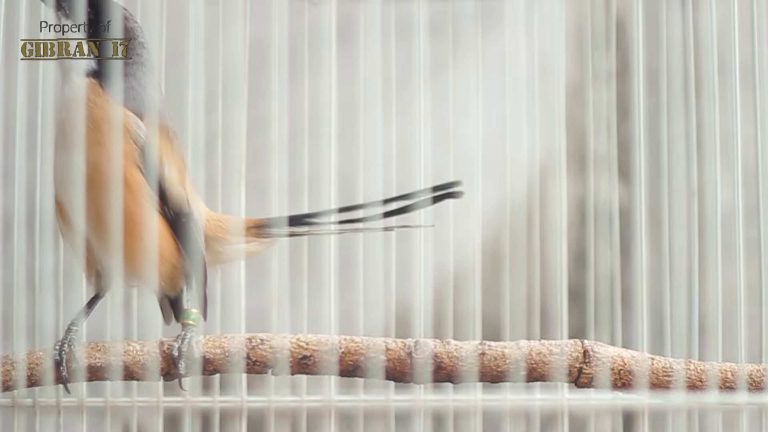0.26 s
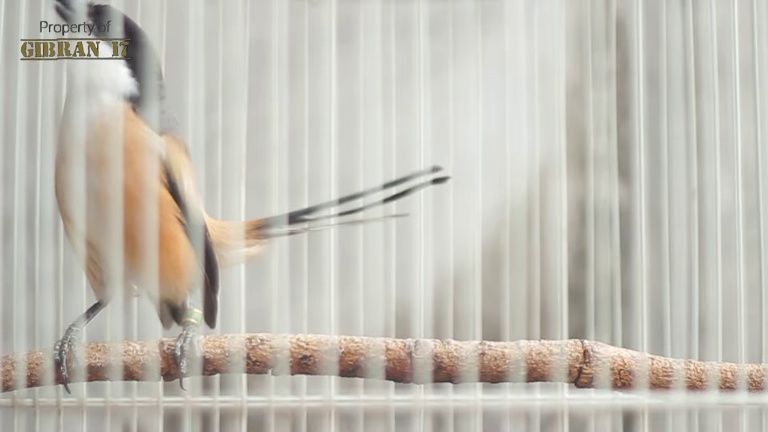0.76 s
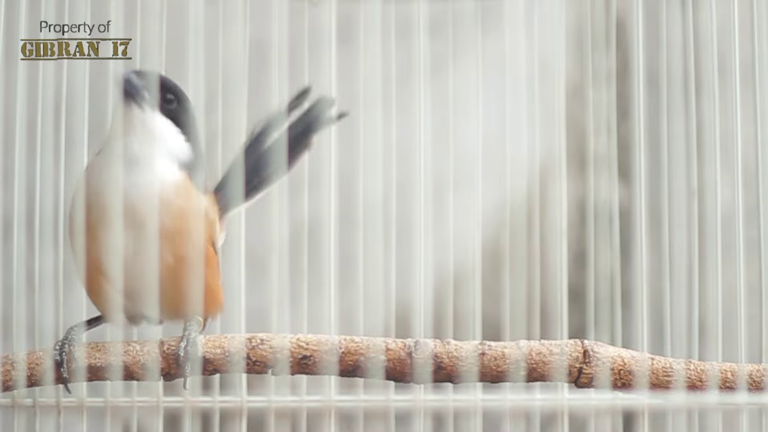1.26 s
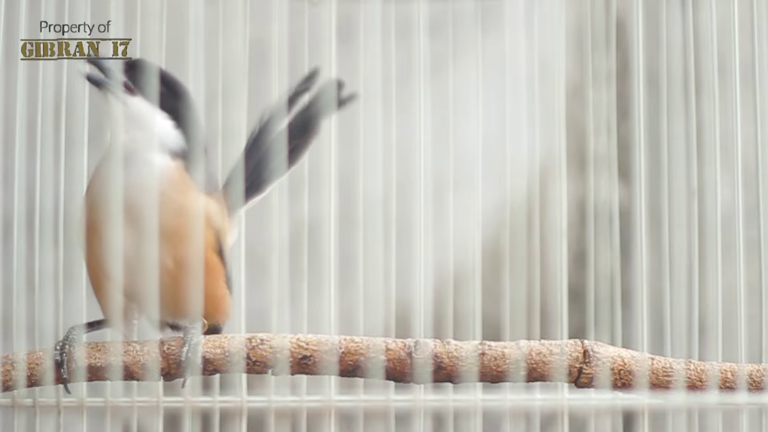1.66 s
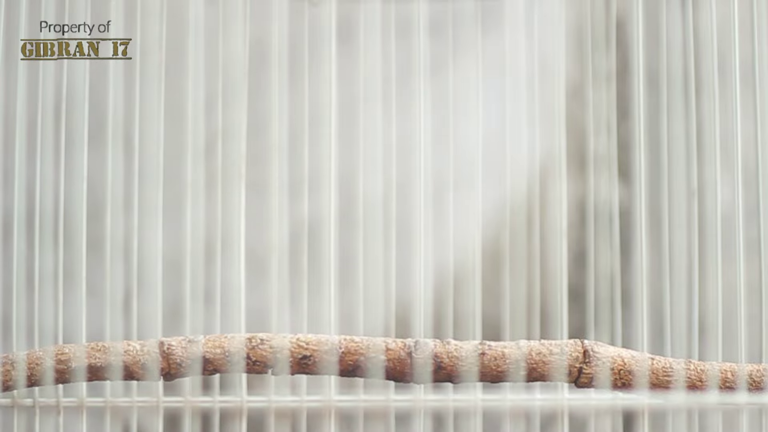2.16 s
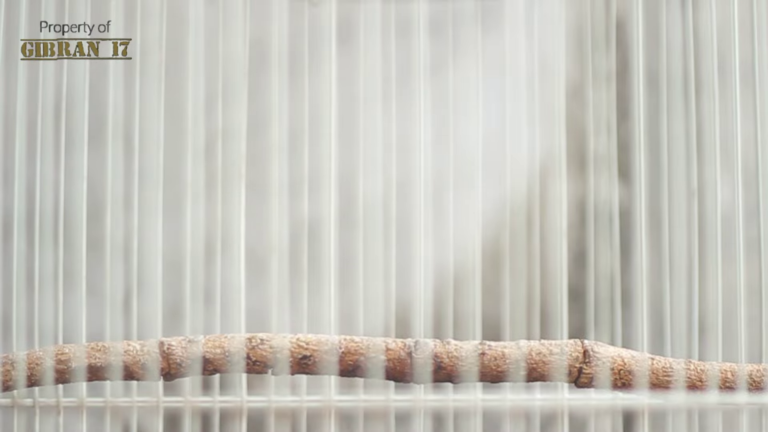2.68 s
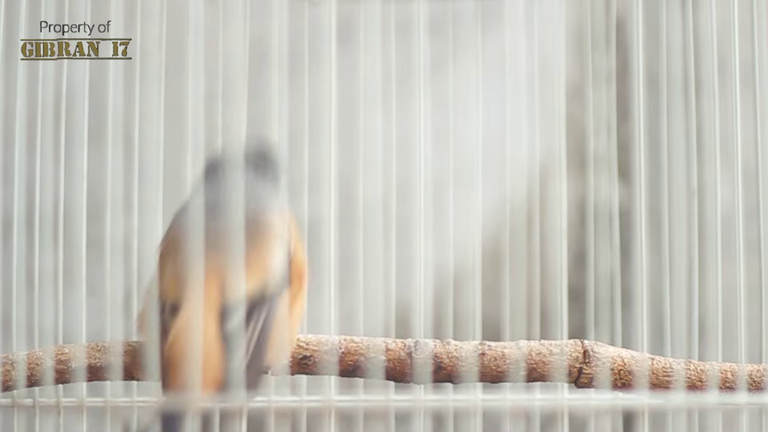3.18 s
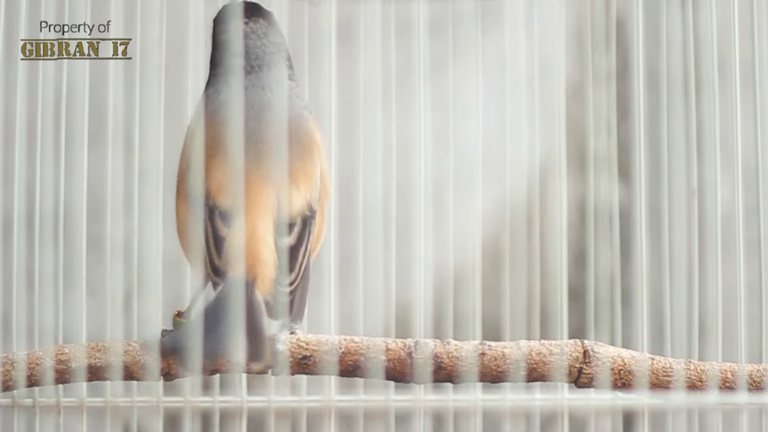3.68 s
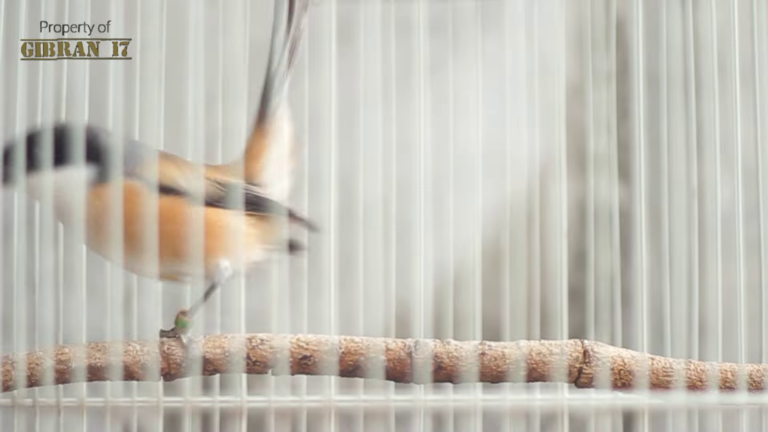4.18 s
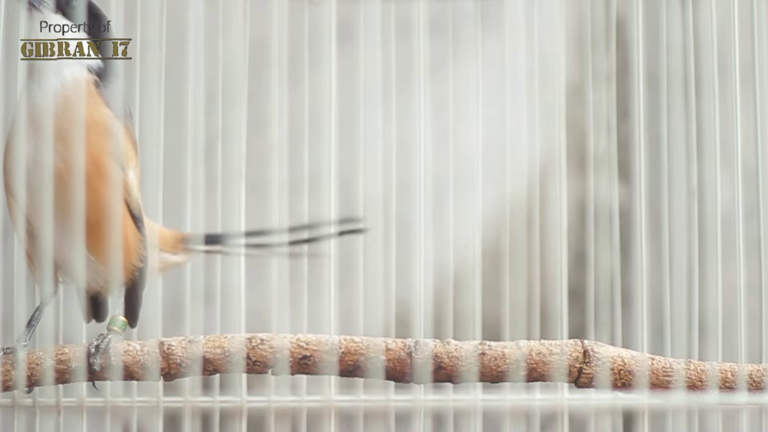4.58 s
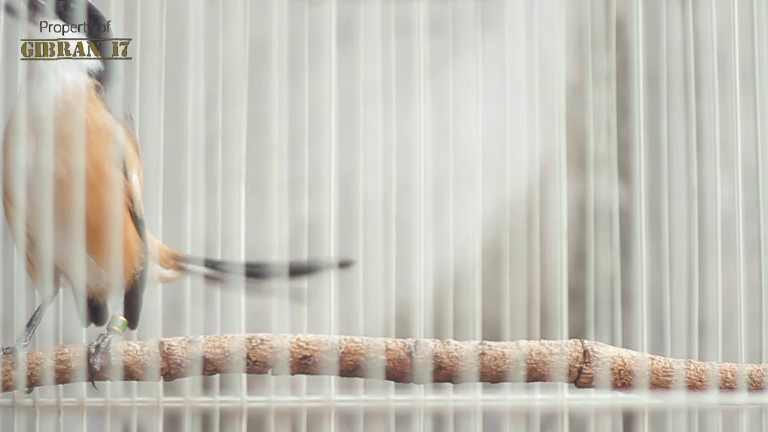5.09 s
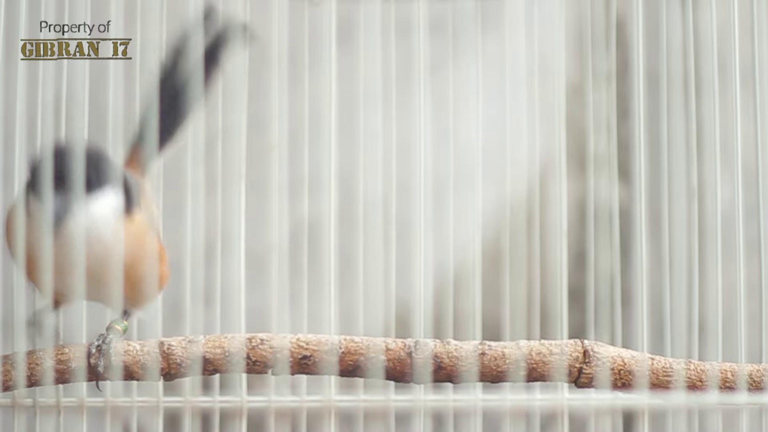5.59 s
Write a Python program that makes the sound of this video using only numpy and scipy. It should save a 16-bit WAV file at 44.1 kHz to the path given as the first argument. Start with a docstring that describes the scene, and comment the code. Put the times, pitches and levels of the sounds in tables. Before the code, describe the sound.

Sharp, high calls from a close caged bird ring briefly in a hard room, slightly overloading the microphone. They begin as evenly spaced, rasping bursts of a chip and two falling whistles, then turn into clearer two-note calls that quicken. Light wing ruffles, dry perch taps and thin wire ticks fall in the gaps, over a faint outdoor rumble and hum, far-off chirps and a distant revving engine.

```python
"""In a hard-walled room, a caged shrike calls close to the microphone, loud enough to overload it.
Its voice box has two sides, each making its own tone. First come rasping calls (a rising chip and two
falling whistles), the earliest heard only as a fading echo; then clear calls (a chip and one whistle)
that get shorter and closer together. Between calls the bird flutters and hops on its perch and wires.
Behind it are faint far-off birds, outdoor rumble, a hum and a distant engine."""
import sys
import numpy as np
from scipy import signal
from scipy.fft import rfft, irfft
from scipy.io import wavfile

SR = 44100
rng = np.random.default_rng(int(sys.argv[2]) if len(sys.argv) > 2 else 0)


def transcribe(signal):
    """Save signal, clipped to [-1, 1], as a 16-bit WAV file at the path in sys.argv[1]."""
    frames = np.atleast_2d(signal).T
    limited = np.clip(frames, -1, 1)
    pcm = np.round(limited * 32767).astype(np.int16)
    wavfile.write(sys.argv[1], SR, pcm)


N = 257544
LEAD = SR // 4   # extra samples before time zero, so an earlier call can echo into the scene


def rasping_calls():
    """A chip sung by both sides of the voice box, then two whistles. Yields (t/s, note, direct/dB)."""
    # one call a row: t/s, chip length/s, chip f/Hz, chip level/dB, chip's second voice/dB,
    # whistle f/Hz, whistle level/dB, note spacing/s, overtones/dB, direct sound/dB
    calls = [(-.240, 0.029, 3180, -8, -6.5, 4230, 2, 0.05, -1, 0),
             (0.4937, 0.025, 3139, -9, -0.5, 4196, 0.5, .049, 0, -3),
             (1.487, .030, 3260, -7, -4.5, 4264, .5, .0515, -1, 0.5),
             (2.444, .032, 3324, -7.5, -2.5, 4317, .5, .050, -3.5, .5),
             (3.274, 0.035, 3205, -8.5, -2.5, 4257, 0.5, 0.054, -1, -1)]
    for s, length, hz, db, second_db, whistle_hz, whistle_db, spacing, overtones_db, direct_db in calls:
        note = chip(length, hz, db, overtones_db - 2.5, second_db,
                    scoop_octaves=.3, creep_octaves=.08, swoop_ratio=1.5, attack_share=.43)
        yield s, note, direct_db
        for k, accent_db in ((1, .27), (2, -2)):   # the second whistle is weaker
            note = whistle(.0275, whistle_hz, whistle_db + accent_db, overtones_db - 1.5, top_hz=6812,
                           glide_share=.33, fade_db=-2, second_hz=5577, second_db=-15.5, edge_db=11.5)
            yield s + k * spacing, note, direct_db


def clear_calls():
    """A chip sung almost by one side alone, then a whistle by both. Yields (t/s, note, direct/dB)."""
    # one call a row: t/s, chip length/s, chip f/Hz, upward slide/octaves, chip level/dB,
    # chip overtones/dB, whistle f/Hz, whistle level/dB, whistle's second voice f/Hz and level/dB,
    # note spacing/s, direct sound/dB
    calls = [(4.393, 0.03, 3430, .28, -7.5, 5.5, 4081, -0.5, 5117, -2, 0.045, 1.5),
             (5.1135, .028, 3236, 0.11, -10, 8.5, 4105, -2, 5348, -5, 0.042, 1.5),
             (5.5359, 0.015, 3300, 0.127, -11, 14, 5396, 0.5, 4456, -11.5, .0415, 2.5)]
    for (s, length, hz, slide, db, overtones_db,
         whistle_hz, whistle_db, second_hz, second_db, spacing, direct_db) in calls:
        note = chip(length, hz, db, overtones_db, second_db=-23,
                    scoop_octaves=.37 * slide, creep_octaves=slide, swoop_ratio=1.36, attack_share=.33)
        yield s, note, direct_db
        note = whistle(.93 * length, whistle_hz, whistle_db, bright_db=-1.5, top_hz=6700,
                       glide_share=.44, fade_db=-5, second_hz=second_hz, second_db=second_db, edge_db=-3)
        yield s + spacing, note, direct_db


def chip(length, held_hz, level_db, bright_db, second_db, scoop_octaves, creep_octaves, swoop_ratio,
         attack_share, second_hz=4330, rasp_db=-17, crescendo_db=2):
    """A note that scoops up, creeps higher, then breaks upward; a higher second voice makes it rasp."""
    share = np.linspace(0, 1, int(length * SR))   # how far through the note we are
    below = 1 - step_up(share, at=.62 * attack_share, width=.066)
    swoop = step_up(share, at=.8, width=.08)
    swell_db = swell(share, attack_share, onset_db=-34, release_share=.12, end_db=-14.5)
    swell_db += crescendo_db * (share - .5)
    tension = 2 ** (creep_octaves * (share - .5) - scoop_octaves * below)
    rough = np.maximum(swoop, from_db(second_db))   # ragged at the break and when both sides sound
    main = voice_box(held_hz * tension * swoop_ratio ** swoop, swell_db, bright_db - 8 * swoop,
                     jitter=.006 + .04 * rough, tremble_db=-.23 + 2 * rough)
    other = voice_box(second_hz * tension, 2 * swell_db + second_db, bright_db,
                      jitter=.035, tremble_db=2.5) * (1 - swoop)
    rasp = np.diff(main * other, prepend=0)   # each side shakes the other's tone
    return from_db(level_db) * (main + other + from_db(rasp_db) * rasp)


def whistle(length, final_hz, level_db, bright_db, top_hz, glide_share, fade_db,
            second_hz, second_db, edge_db):
    """One side plunges in pitch, rough and bright at first, then settles; the other sinks a little."""
    share = np.linspace(0, 1, int(length * SR))
    height = np.exp(-(share / glide_share) ** 2)
    effort_db = level_db + fade_db * share
    main_db = effort_db + swell(share, attack_share=.41, onset_db=-26.5, release_share=.15, end_db=-12.5)
    other_db = effort_db + swell(share, attack_share=.2, onset_db=-31.5, release_share=.47, end_db=-10)
    main = voice_box(final_hz + (top_hz - final_hz) * height, main_db, bright_db + 7 * height ** 2,
                     jitter=.014 + .045 * height, tremble_db=1 + 5.2 * height)
    other = voice_box(second_hz * (1 + .14 * height), other_db + second_db, bright_db + edge_db,
                      jitter=.025, tremble_db=2)
    return main + other


def voice_box(hz, level_db, bright_db, jitter, tremble_db, hiss_db=-39):
    """One side of the voice box: a tone with overtones and a little breath; pitch and level tremble."""
    # overtones of the voice: multiple of the pitch, level/dB
    overtones = [(2, -16), (3, -26), (4, -48.5)]
    # how the throat and open beak colour the overtones: f/Hz, gain/dB
    beak = [(5000, 8.5), (6600, -1), (7600, -1), (8500, 0), (9700, -6.5), (11300, 1.5), (12400, 2),
            (13700, 7), (16000, 4)]
    size = len(hz)
    hz = hz * (1 + jitter * waver(1500, size))
    phase = 2 * np.pi * np.cumsum(hz) / SR
    tone = np.sin(phase)
    for multiple, db in overtones:
        gain = from_db(db + bright_db + at_hz(beak, multiple * hz))
        tone += gain * np.sin(multiple * phase) * (multiple * hz < SR / 2)
    highpass = signal.butter(2, 5000, "high", fs=SR, output="sos")
    tone += from_db(hiss_db) * signal.sosfilt(highpass, rng.standard_normal(size))
    soft_edges = signal.windows.tukey(size, .1)
    return tone * soft_edges * from_db(level_db + tremble_db * waver(1200, size))


def wire_ticks(track, scratch_db=-8, scratch_s=.005, rise_s=.0019):
    """Claws and beak scratch the wires and leave the thin bars ringing."""
    # touches on the wires: t/s, level/dB, ring relative to that level/dB
    ticks = [(1.7838, -29, -26.5), (1.8901, -22, -31), (2.9958, -20, -19), (3.1144, -27.5, -23.5),
             (4.2013, -25, -21), (4.262, -41, -24.5), (4.286, -22.5, -26), (5.717, -35.5, -27),
             (5.801, -28.5, -25)]
    # ringing tones of the bars: f/Hz, level/dB, time to fade by 60 dB/s
    bar_tones = [(2012, -12, 0.28), (2851, -6, 0.076), (4160, -2.5, 0.07), (5200, -4.5, 0.035),
                 (7250, -17, .3), (8750, -14.5, .2), (12350, -12, 0.074), (13100, -15, .16)]
    t = np.arange(SR // 4) / SR
    for s, level_db, ring_db in ticks:
        ring = sum(from_db(db + rng.normal(0, 3) - 60 * t / fade_s) * np.sin(2 * np.pi * hz * t)
                   for hz, db, fade_s in bar_tones)
        scratch = rng.standard_normal(len(t)) * np.exp(-t / scratch_s) * (1 - np.exp(-t / rise_s))
        add(track, s, from_db(level_db) * (from_db(ring_db) * ring + from_db(scratch_db) * scratch))


def perch_knocks(track, knock_db=-4, decay_s=.0045):
    """Feet land on the wooden perch with dry taps that die quickly."""
    # landings: t/s, level/dB
    knocks = [(1.061, -38.5), (1.753, -26.5), (1.909, -27.5), (3.001, -26), (3.129, -27.5), (5.677, -19.5)]
    # tone colour of the wood: f/Hz, level/dB
    wood = [(300, -20), (600, -15.5), (830, -5.5), (1200, -8.5), (1800, -8.5), (3200, 1.5), (5000, -6.5),
            (9000, -28.5), (16000, -32.5)]
    t = np.arange(SR // 16) / SR
    for s, db in knocks:
        add(track, s, from_db(db + knock_db) * coloured(wood, len(t)) * np.exp(-t / decay_s))


def flutters(track, ruffle_db=1.5):
    """Feathers brush the air in uneven puffs, brighter when they graze the bars."""
    # wing and tail strokes: peak t/s, half length/s, level/dB, treble tilt/(dB per octave)
    strokes = [(1.343, 0.032, -44, -2), (1.928, 0.02, -37, 5.5), (1.973, 0.038, -44.5, 2.5),
               (3.155, 0.06, -45, 2), (4.305, 0.042, -45.5, 1), (5.229, 0.046, -45.5, 2.5),
               (5.692, 0.067, -45.5, 0)]
    # tone colour of the feathers: f/Hz, level/dB
    feathers = [(150, -20.5), (500, -3.5), (820, 5), (1100, 1), (2000, -4), (4000, -7.5), (7000, -20),
                (15000, -26.5)]
    t = np.arange(-SR // 8, SR // 8) / SR
    for s, half_length, level_db, tilt_db in strokes:
        colour = [(hz, db + tilt_db * np.log2(hz)) for hz, db in feathers]
        puff = coloured(colour, len(t)) * np.exp(-(t / half_length) ** 2)
        add(track, s + t[0], puff * from_db(level_db + ruffle_db * waver(160, len(t))))


def room(x, diffuse_db=-3.5, late_db=-13, build_s=.0055, scatter_s=.00057):
    """A few echoes scattered by the bars, then a wash of sound that falls fast at first and lingers."""
    # time the room takes to fade by 60 dB: f/Hz, early fade/s, late fade/s
    fades = [(500, 0.57, .7), (3200, 0.26, 0.71), (4690, 0.35, 0.69), (6100, 0.25, 0.56),
             (8850, 0.29, 0.49), (14000, 0.2, .36)]
    # echoes from the nearest surfaces and the far wall: delay/s, level/dB
    echoes = [(.003, -7.5), (0.0153, -11), (.023, -19), (.048, -17)]
    t = np.arange(SR) / SR
    white, bins = rfft(rng.standard_normal(SR)), np.fft.rfftfreq(SR, 1 / SR)
    centres_hz = [row[0] for row in fades]
    tail = np.zeros(SR)
    for (_, early, late), this_band in zip(fades, np.eye(len(fades))):
        band = irfft(white * np.interp(bins, centres_hz, this_band), SR)
        tail += band * np.hypot(from_db(-60 * t / early), from_db(late_db - 60 * t / late))
    tail *= 1 - np.exp(-(t / build_s) ** 2)
    response = from_db(diffuse_db) * tail / np.sqrt(np.sum(tail ** 2))
    for delay, db in echoes:
        splash = rng.standard_normal(SR) * np.exp(-np.abs(t - delay) / scatter_s) * (t >= delay)
        response += from_db(db) * splash / np.sqrt(np.sum(splash ** 2))
    return signal.fftconvolve(x, response)[:len(x)]


def far_birds(track, blur_hz=380):
    """Birds further off sing soft sliding notes, made hoarse by an unsteady pitch."""
    # chirps: t/s, length/s, first f/Hz, last f/Hz, level/dB
    chirps = [(0.287, 0.037, 2550, 2395, -47.5), (0.406, .06, 3952, 3918, -46),
              (2.875, .12, 2804, 2480, -46.5), (4.817, 0.126, 2642, 2258, -45)]
    for s, length, first_hz, last_hz, db in chirps:
        size = int(length * SR)
        hz = np.linspace(first_hz, last_hz, size) + blur_hz * waver(440, size)
        add(track, s, from_db(db) * np.hanning(size) * np.sin(2 * np.pi * np.cumsum(hz) / SR))


def outdoors(air_db=-48, hum_hz=151, hum_db=-59.5):
    """Steady rumbling air, a wavering hum and a far engine that revs up and down."""
    # the engine's changing note: t/s, f/Hz, level/dB
    revs = [(0, 340.1, -73.5), (2.3, 380.5, -66), (3.15, 438.3, -55), (3.38, 333.5, -53.5),
            (3.66, 453.3, -49), (3.85, 371.6, -54), (4.2, 312.6, -52), (4.7, 353, -68.5),
            (5.8, 397.6, -54.5)]
    # tone colour of the air: f/Hz, relative level/dB
    air = [(15, -53), (25, -20), (84, -5.5), (120, -13), (153, -4.5), (270, -4), (301, -6), (344, -4.5),
           (373, -7), (451, -6.5), (887, -11), (3080, -20.5), (3820, -19), (5880, -27), (16000, -34.5)]
    t = np.arange(N) / SR
    times, hz, db = np.transpose(revs)
    engine = from_db(np.interp(t, times, db)) * drone(np.interp(t, times, hz), width_hz=50)
    hum = from_db(hum_db) * drone(np.full(N, hum_hz), width_hz=14)
    return from_db(air_db) * coloured(air, N) + engine + hum


def drone(hz, width_hz):
    """A narrow band of noise that follows a pitch."""
    wobble = waver(width_hz, N) + 1j * waver(width_hz, N)
    return rms_one(np.real(wobble * np.exp(2j * np.pi * np.cumsum(hz) / SR)))


def from_db(db):
    """Turn decibels into a gain."""
    return 10 ** (np.asarray(db) / 20)


def rms_one(x):
    """Scale a sound to an average strength (rms) of 1."""
    return x / np.sqrt(np.mean(x ** 2) + 1e-20)


def at_hz(points, hz):
    """Read a level between the rows of an (f/Hz, level/dB) table, on a scale of octaves."""
    table_hz, db = np.transpose(points)
    return np.interp(np.log(np.maximum(hz, 1)), np.log(table_hz), db)


def coloured(spectrum, size):
    """Noise with the given tone colour."""
    gain = from_db(at_hz(spectrum, np.fft.rfftfreq(size, 1 / SR)))
    return rms_one(irfft(rfft(rng.standard_normal(size)) * gain, size))


def waver(rate_hz, size):
    """A random wobble of about 1 either way."""
    steps = np.arange(size) * rate_hz / SR
    return np.interp(steps, np.arange(size), rng.standard_normal(size))


def step_up(share, at, width):
    """A smooth step from 0 to 1."""
    return .5 + .5 * np.tanh((share - at) / width)


def swell(share, attack_share, onset_db, release_share, end_db):
    """How a note rises, holds and fades, in dB."""
    rise_db = onset_db * np.maximum(1 - share / attack_share, 0)
    return rise_db + end_db * np.maximum(1 - (1 - share) / release_share, 0)


def add(track, s, sound):
    """Mix a sound in at s seconds; tracks begin LEAD samples before time zero."""
    start = max(LEAD + int(s * SR), 0)
    part = sound[:max(len(track) - start, 0)]
    track[start:start + len(part)] += part


def scene():
    """The room echoes every note alike; the direct sound depends on where the beak points."""
    direct, into_room, cage = np.zeros((3, LEAD + N))
    for s, note, direct_db in (*rasping_calls(), *clear_calls()):
        add(into_room, s, note)
        add(direct, s, from_db(direct_db) * note)
    wire_ticks(cage)
    perch_knocks(cage)
    flutters(cage)
    far_birds(into_room)
    indoors = direct + cage + room(into_room + cage)
    return (indoors[LEAD:] + outdoors())[None]


def record(dry, lopsided=.0077, cutoff_hz=15750):
    """Overload flattens the loudest peaks, a little unevenly; the highest treble is cut."""
    flattened = np.clip(dry, -1, 1 - lopsided)
    return signal.sosfilt(signal.ellip(10, .1, 70, cutoff_hz, fs=SR, output="sos"), flattened)


dry = scene()
out = record(dry)
transcribe(out)
```